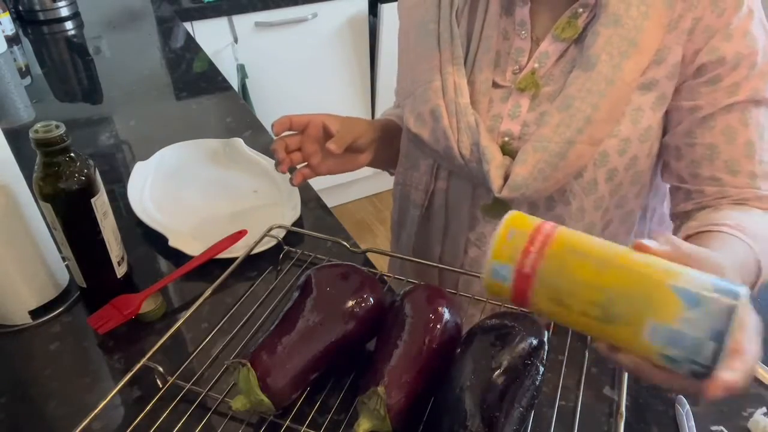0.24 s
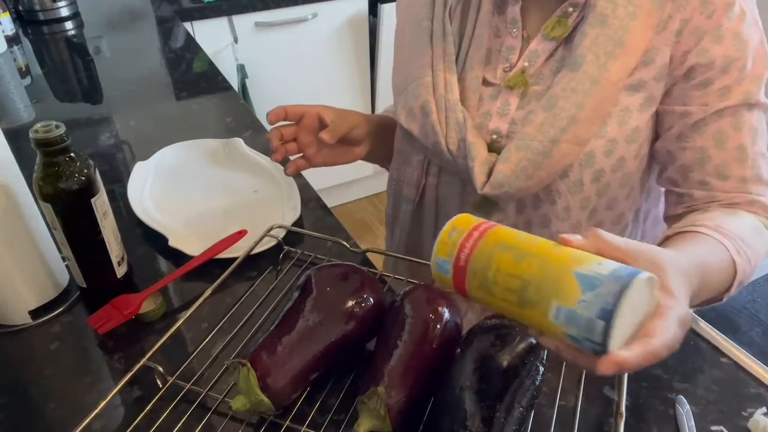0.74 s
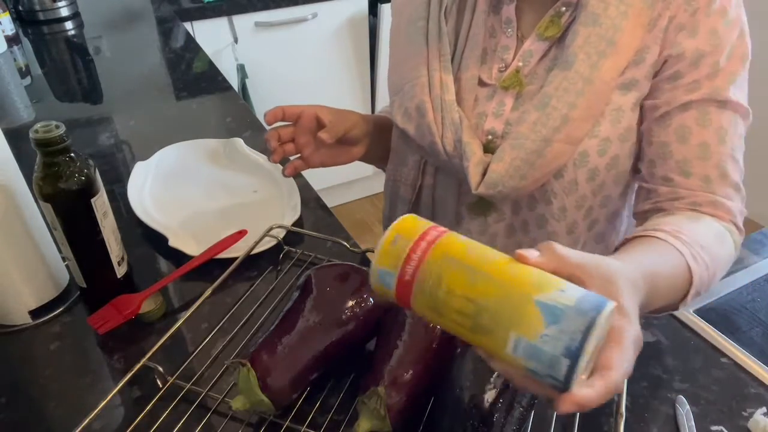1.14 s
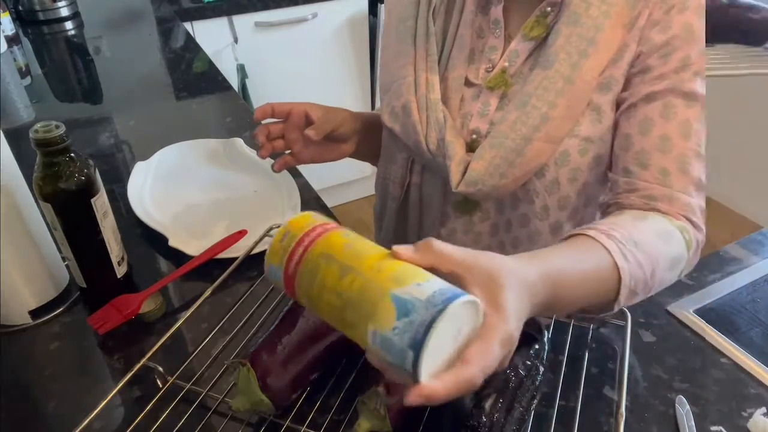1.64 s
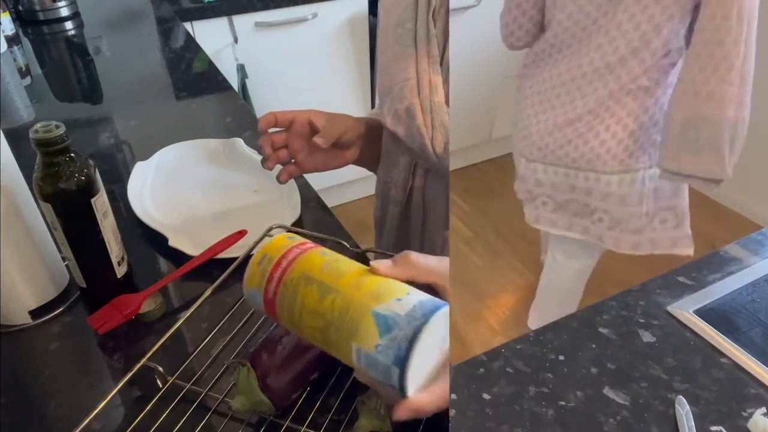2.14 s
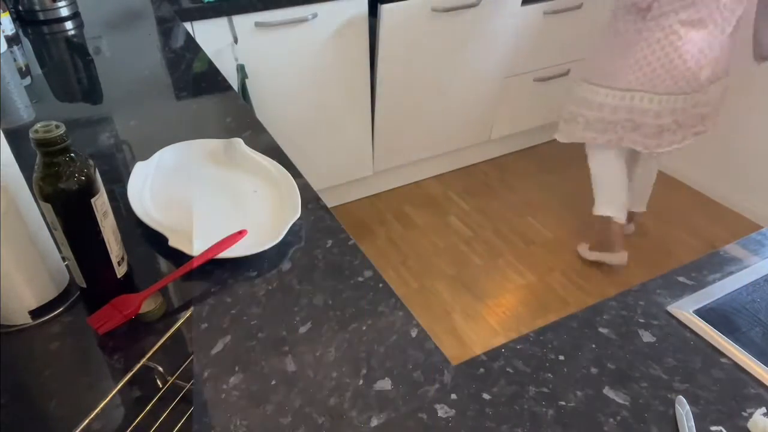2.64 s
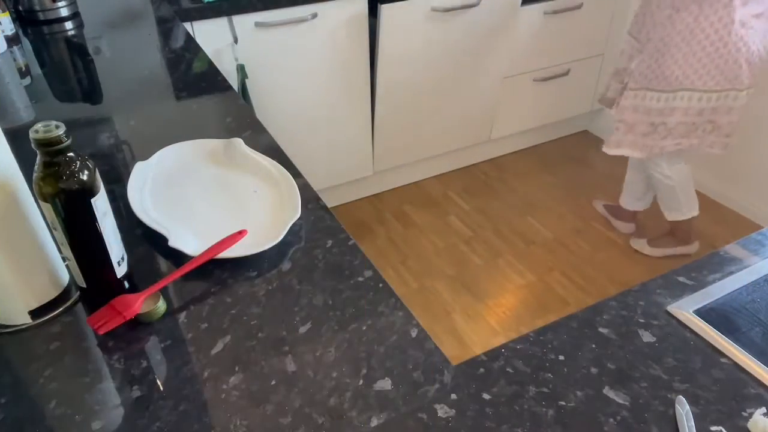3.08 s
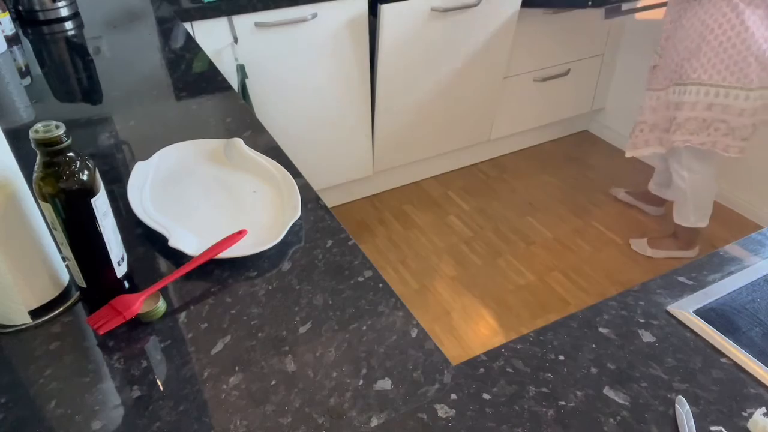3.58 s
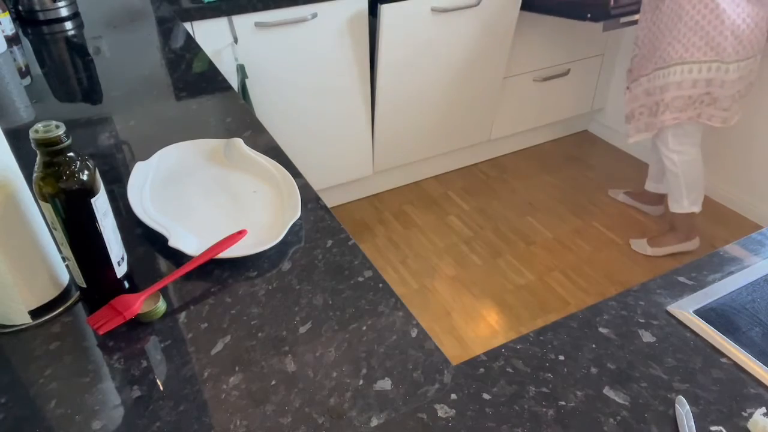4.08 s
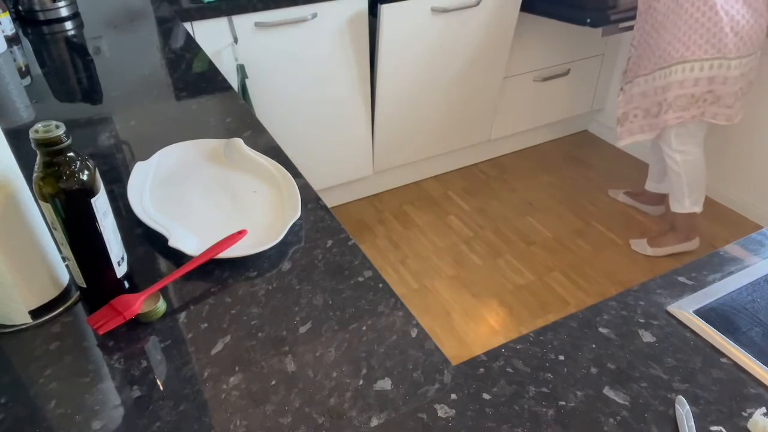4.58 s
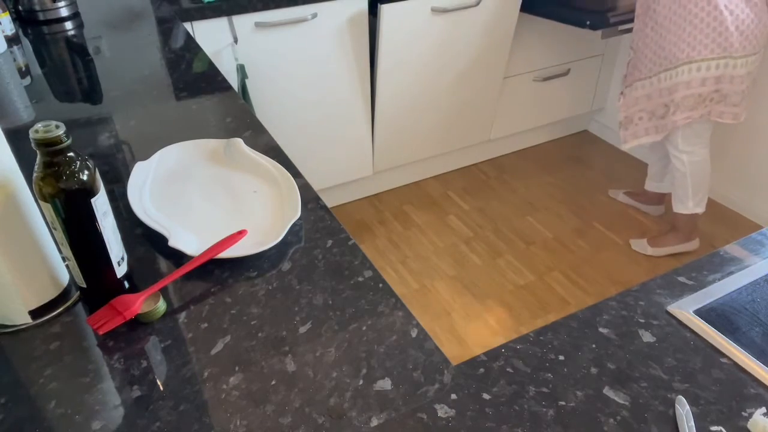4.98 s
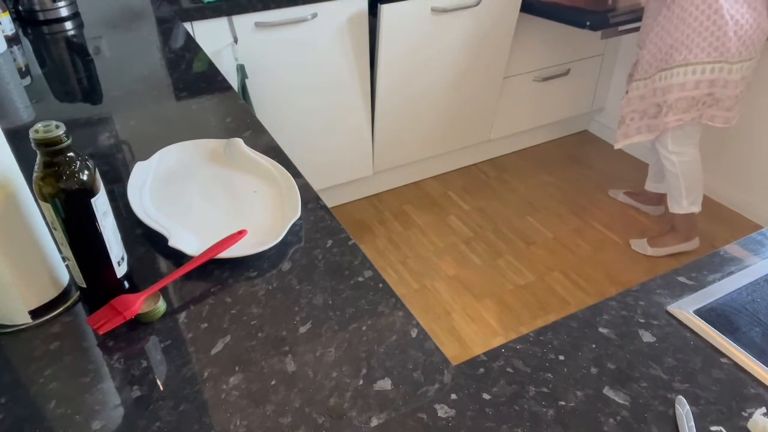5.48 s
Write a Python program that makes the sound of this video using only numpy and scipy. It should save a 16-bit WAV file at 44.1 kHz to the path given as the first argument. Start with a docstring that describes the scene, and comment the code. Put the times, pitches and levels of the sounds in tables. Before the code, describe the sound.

Salt is shaken rhythmically close by from a tub, then across the kitchen a metal rack clinks, scrapes along oven rails and bangs into place.

```python
"""Salt is shaken over aubergines on a wire rack, close to the microphones, in a small kitchen: clouds of
random grain impacts ring a tub. The last grains slide back. Across the room the rack clinks, is set into
the oven and scrapes along its rails: bursts and streams of contacts ring its wires. It bangs against
the casing, whose panels ring as dying partials. Shaped noise gives a low rumble, hum, room air,
a soft fan and a rustle."""
import sys
import numpy as np
from scipy import signal
from scipy.fft import rfft, irfft, next_fast_len
from scipy.io import wavfile
from scipy.ndimage import uniform_filter1d

SR = 44100
rng = np.random.default_rng(int(sys.argv[2]) if len(sys.argv) > 2 else 0)


def put_to_file(sound):
    """Save the sound as 16-bit audio at rate SR, in the file named by the first command-line argument."""
    columns = np.atleast_2d(sound).T  # one column per channel
    safe = np.clip(columns, -1, 1)
    whole_steps = np.round(safe * 32767)
    wavfile.write(sys.argv[1], SR, whole_steps.astype(np.int16))


N = 252252
PADDED = 2 * next_fast_len(N // 2 + SR // 4)
BINS_HZ = np.fft.rfftfreq(PADDED, 1 / SR)
TIME_S = np.arange(N) / SR


def gain_of(db):
    """Decibels to a factor."""
    return 10 ** (np.asarray(db) / 20)


def evened(x):
    """Scales to rms 1."""
    return x / np.sqrt(np.mean(x ** 2) + 1e-20)


def read(points, hz):
    """Reads a curve on a log-frequency axis."""
    f, value = np.transpose(points)
    return np.interp(np.log(hz + 1), np.log(f + 1), value)


def add(mix, s, sound):
    """Adds a sound into the mix at a time."""
    part = mix[..., max(round(s * SR), 0):][..., :sound.shape[-1]]
    part += sound[..., :part.shape[-1]]


def filtered(x, response):
    """Applies a frequency response."""
    return irfft(rfft(x, PADDED) * response)[..., :N]


def coloured(x, points, size=2048):
    """Minimum-phase filter with the given spectrum, so attacks stay sharp."""
    log_gain = np.log(gain_of(read(points, abs(np.fft.fftfreq(size, 1 / SR)))))
    taps = np.fft.ifft(np.exp(np.conj(signal.hilbert(log_gain)))).real
    return signal.oaconvolve(x, taps[None], axes=1)[:, :x.shape[1]]


def paired(x, image):
    """Blends two unrelated channels to the likeness (within +-0.99) and lean of each frequency."""
    hz, likeness, left_db = np.transpose(image)
    c = np.clip(read(np.c_[hz, likeness], BINS_HZ), -.99, .99)
    mid, side = filtered(x, np.sqrt([(1 + c) / 2, (1 - c) / 2]))
    lean = gain_of(read(np.c_[hz, left_db], BINS_HZ) / 2)
    return filtered(np.array([mid + side, mid - side]), np.array([lean, 1 / lean]))


def contacts(per_s, spread_db, size):
    """Random tiny impacts of uneven strength, mean power 1, for two channels."""
    chance = np.clip(per_s / SR, 1e-4, 1)
    strength = gain_of(spread_db * np.minimum(rng.exponential(1, (2, size)), 4))
    sign = rng.choice([-1., 1.], (2, size))
    hit = rng.random((2, size)) < chance
    return evened(strength * sign * hit / np.sqrt(chance))


def clumps(depth_db, size=300):
    """Random swells a few milliseconds long, mean power 1."""
    return evened(gain_of(depth_db * evened(uniform_filter1d(rng.standard_normal(N), size))))


def shifting(x, s, bright, pivot_hz, patchy_db, above_hz, size=8):
    """Tilts the colour over time; as the contact point wanders, patches of the spectrum swell and fade."""
    hz, t, z = signal.stft(x, SR, nperseg=512)
    octaves = np.log2(np.maximum(hz, above_hz) / pivot_hz)[:, None]
    patches = uniform_filter1d(rng.standard_normal(z.shape[1:]), size, axis=1)
    patches = evened(uniform_filter1d(patches, size // 2, axis=0))
    z = z * gain_of(octaves * np.interp(t, s, bright)) * evened(gain_of(patchy_db * patches))
    return signal.istft(z, SR, nperseg=512)[1][:, :N]


def resonance(hz, width_hz, db, bins_hz=BINS_HZ):
    """Frequency response of one damped mode."""
    return gain_of(db) / (1 + 2j * (bins_hz - hz) / width_hz)


def ringing_modes(modes, t):
    """Sum of partials, each dying by 60 dB in its t60."""
    hz, db, t60_s = np.transpose(modes)[:, :, None]
    return (gain_of(db - 60 * t / t60_s) * np.sin(2 * np.pi * hz * t)).sum(-2)


# Decay of the room. Each row: frequency in Hz, t60 in seconds.
ROOM_T60 = [(150, 0.34), (500, 0.36), (1400, 0.2), (3700, 0.2), (10000, 0.16)]


def room(x, wet_db, drift_hz=0., count=3):
    """Direct sound plus sparse reflections that die band by band; a moving source drifts between echo patterns."""
    out = x.copy()
    for k in range(count):
        taps = rng.choice([-1., 1.], (2, SR // 2)) * (rng.random((2, SR // 2)) < .1)
        taps[:, :130] = 0  # 3 ms before the first echo
        hz, t, z = signal.stft(taps, SR, nperseg=256)
        tail = signal.istft(z * gain_of(-60 * t / read(ROOM_T60, hz)[:, None]), SR, nperseg=256)[1]
        tail *= gain_of(wet_db) / np.linalg.norm(tail, axis=1, keepdims=True)
        share = np.sqrt(2 / count) * np.cos(2 * np.pi * (drift_hz * TIME_S + k / count))
        out += signal.fftconvolve(x * share, tail, axes=1)[:, :N]
    return out / np.hypot(1, gain_of(wet_db))


def steady(spectrum, levels, image):
    """Noise of one colour that follows a slow level."""
    noise = evened(filtered(rng.standard_normal((2, N)), gain_of(read(spectrum, BINS_HZ))))
    return paired(noise, image) * gain_of(np.interp(TIME_S, *np.transpose(levels)))


# Far side of the room, for the far sounds. Each row: frequency in Hz, left-right likeness, left minus right in dB.
FAR_IMAGE = [(99.4, 0.97, 2), (203, 1, 1.5), (337, 0.78, 4.5), (572, -0.38, 1.5), (800, 1, -2.5),
             (1400, -0.41, 2.5), (2520, 0.4, 1), (4300, 0.22, 2.5), (7530, -0.21, 2.5), (11500, -0.17, 6),
             (11700, 0.41, 5), (14400, -1.08, 1.5)]
# Spectrum: each row: frequency in Hz, relative dB per Hz. Level: each row: time in seconds, dB before the lean.
RUMBLE_SPECTRUM = [(20, -46), (38, -16), (55, 11), (80, -4), (110, 3.5), (170, -12.5), (400, -51)]
RUMBLE_LEVEL = [(0, -52), (2.3, -55), (3.0, -71), (5.72, -100)]


def rumble():
    """Low noise peaking near 55 Hz that fades out."""
    return steady(RUMBLE_SPECTRUM, RUMBLE_LEVEL, FAR_IMAGE)


# Spectrum: each row: frequency in Hz, relative dB per Hz. Level: each row: time in seconds, dB before the lean.
HUM_SPECTRUM = [(30, -52), (70, -22), (105, 1.5), (140, 2), (175, -6.5), (225, 1.5), (300, -16.5),
                (400, -57.5), (900, -55)]
HUM_LEVEL = [(0, -77), (2.1, -66), (3.15, -49.5), (3.85, -54), (5.72, -52)]


def hum():
    """Humming noise, strongest at 100-225 Hz."""
    return steady(HUM_SPECTRUM, HUM_LEVEL, FAR_IMAGE)


# Spectrum: each row: frequency in Hz, relative dB per Hz. Level: each row: time in seconds, dB before the lean.
AIR_SPECTRUM = [(150, -17), (380, 9), (520, 7), (780, 7.5), (1150, 0), (2300, -8.5), (4000, -15.5),
                (8000, -20), (12500, -24), (15000, -34)]
AIR_LEVEL = [(0, -67), (1.6, -58.5), (2.8, -69), (4.0, -66), (5.72, -59.5)]
# Each row: frequency in Hz, left-right likeness, left minus right in dB.
AIR_IMAGE = [(129, 0.21, 52), (344, 0.13, 0), (700, 0.1, 2.5), (2980, 0.056, 3)]


def room_air():
    """Wide mid-range noise of the room air."""
    return steady(AIR_SPECTRUM, AIR_LEVEL, AIR_IMAGE)


# Spectrum: each row: frequency in Hz, relative dB per Hz. Level: each row: time in seconds, dB before the lean.
FAN_SPECTRUM = [(300, -20), (600, -22), (1150, 10.5), (2000, 3), (2700, -4), (5000, -23), (12000, -55)]
FAN_LEVEL = [(0, -96), (3.3, -66.5), (5.72, -60.5)]


def oven_fan():
    """Soft fan noise around 1-2 kHz that grows."""
    return steady(FAN_SPECTRUM, FAN_LEVEL, FAR_IMAGE)


# Spectrum: each row: frequency in Hz, relative dB per Hz. Level: each row: time in seconds, dB before the lean.
RUSTLE_SPECTRUM = [(800, 8.5), (2500, 4.5), (5000, 0.5), (9000, -1.5), (13000, -0.5), (16000, 10)]
RUSTLE_LEVEL = [(0, -59), (2.6, -73), (3.25, -57), (3.46, -56), (3.62, -85)]


def rustle():
    """Soft broad noise whose level dips and swells."""
    return steady(RUSTLE_SPECTRUM, RUSTLE_LEVEL, FAR_IMAGE)


# Rack against oven, for casing() and knocks(). Each row: start in seconds, relative level in dB,
# brightness in dB per octave, build-up in seconds, relative deep boom in dB, relative hollow panel in dB,
# pitch of its thud in Hz, ring of the wires in dB, pitch of the touched spot in Hz.
KNOCKS = [ (3.08, -42, -0.1, 0.0023, -56, -49, 328, -18, 7800),
          (3.475, -35.5, 1.4, 0.0026, -46, -41.5, 258, -17, 4000),
          (4.010, -50, -4.5, 0.0062, -51, -30, 274, -2, 1050),
          (4.139, -42.5, -1, 0.0057, -53, -37.5, 280, -18, 1130),
          (4.212, -34, -0.1, 0.01, -31, -31.5, 268, -3.5, 835),
          (4.490, -53, 1, 0.0081, -36, -45.5, 223, 11, 1950),
          (4.677, -29.5, -0.5, 0.0048, -37, -30, 230, 0.5, 1500),
          (4.684, -29.5, -1.5, 0.005, -12, -26.5, 224, -2, 1060),
          (4.695, -26.5, -1.5, 0.0022, -50, -30, 231, -10.5, 2060),
          (4.719, -35.5, -3, .003, -50, -35, 297, -10, 1100),
          (4.776, -42.5, -4, 0.00667, -35, -33, 276, 1, 830),
          (4.859, -48.5, -6.5, 0.0028, -40.5, -62, 294, -1.5, 1070),
          (4.986, -41.5, -5, 0.0091, -24.5, -38, 258, 3, 842),
          (5.003, -38, -5, 0.0055, -40, -26.5, 253, 0, 1190),
          (5.016, -33.5, -1.5, 0.00615, -46, -37, 287, -1, 1200),
          (5.043, -38.5, -0.5, 0.0038, -40, -32.5, 252, -7, 1200),
          (5.078, -42, -0.5, 0.0037, -34, -44, 248, 1.5, 840),
          (5.132, -48, -3, 0.0036, -52, -43, 218, -7, 1100),
          (5.293, -47, -0.5, 0.0034, -37, -42, 284, -10, 1210),
          (5.456, -46, -2.5, 0.0029, -66, -54, 270, 5.5, 1250),
          (5.504, -48, -2, 0.0058, -64, -32.5, 272, 5, 870),
          (5.669, -38, 0.5, 0.0022, -60, -45, 330, 3, 6500)]
# Deep boom of the casing, then its hollow panels. Each row: frequency in Hz, relative level in dB, t60 in seconds.
BOOM_MODES = [(134.7, -3.5, 0.23), (177, -19.5, 0.18)]
PANEL_MODES = [(233.7, -4, 0.11), (298, -6.5, 0.33), (398, -20.5, 0.26), (444, -25, 0.31),
               (483, -19, 0.074)]
PANEL_SWELL_S = 0.004
THUD_DB, THUD_T60_S = 6, 0.095  # the struck part of the panel thuds at its own pitch


def casing(low_hz=90):
    """Blows set the oven's panels swinging; they take a moment to swell and radiate no deep bass."""
    out, t = np.zeros(N), np.arange(SR // 2) / SR
    boom, panel = ringing_modes(BOOM_MODES, t), ringing_modes(PANEL_MODES, t)
    swell = 1 - np.exp(-t / PANEL_SWELL_S)
    for s, _, _, build_s, boom_db, panel_db, thud_hz, _, _ in KNOCKS:
        thud = ringing_modes([(thud_hz, THUD_DB, THUD_T60_S)], t)
        blow = gain_of(boom_db) * boom + gain_of(panel_db) * (panel + thud)
        # the casing gives way when the knock reaches its full force
        add(out, s + build_s, blow * swell)
    out = signal.sosfilt(signal.butter(5, low_hz, "high", fs=SR, output="sos"), out)
    return room(np.array([out, out]), wet_db=-21) * gain_of(0) * np.array([[gain_of(.7)], [gain_of(-.7)]])


# Where thump, clunk, ring and tick lie, in Hz.
STRIKE_HZ = [450, 1200, 4400, 11500]
PIVOT_HZ, ENDS_LIFT_DB = 4350, 0.02  # brightness pivots here; the ends rise by this much per octave squared


def strike(db, bright, build_s, decay_s, thump_growth=0.19, snap_db=-1, snap_decay_s=0.0053):
    """A sharp first contact, and a burst of smaller ones that builds up and rattles out."""
    t = np.arange(SR // 3) / SR
    force = np.minimum((t + 1 / SR) / build_s, 1) * np.exp(-np.maximum(t - build_s, 0) / decay_s)
    rattle = force * contacts(per_s=6000, spread_db=2.0, size=len(t))
    # the first metal-on-metal touch is short and bright
    touch = contacts(per_s=26000, spread_db=-1.0, size=len(t))
    snap = np.diff(touch, prepend=0) * np.exp(-t / snap_decay_s)
    octaves = np.log2(np.array(STRIKE_HZ[1:]) / PIVOT_HZ)
    clunk_db, ring_db, tick_db = db + bright * octaves + ENDS_LIFT_DB * octaves ** 2
    # weak knocks move the heavy parts less
    thump_db = clunk_db + thump_growth * min(clunk_db + 28.0, 0)
    spectrum = list(zip(STRIKE_HZ, (thump_db, clunk_db, ring_db, tick_db)))
    return coloured(rattle + gain_of(snap_db) * snap, spectrum)


# Wires of the rack and walls of the oven. Each row: frequency in Hz, width in Hz,
# dB over the broad clatter before the ring of each touch.
RACK_MODES = [(825, 26, -11.5), (840, 26, -3.5), (1058, 22, -7.5), (1080, 25, -4.5), (1244, 23, 4.5),
              (1298, 17, -19), (1960, 53, 4.5), (2075, 16, 1), (2250, 12, -22), (2663, 85, 1),
              (3030, 80, 3), (3090, 9.5, -18), (4190, 310, 0.5), (3950, 39, -13)]


def wires(x, ring_db, uneven_db=2.0, detune=0.01):
    """Rings the rack; every touch stirs its modes in other proportions and bends their pitch a little."""
    size = next_fast_len(x.shape[1] + SR // 8)
    bins_hz = np.fft.rfftfreq(size, 1 / SR)
    chance = rng.standard_normal((len(RACK_MODES), 2))
    body = 1
    for (hz, width_hz, db), (bend, share) in zip(RACK_MODES, chance):
        body = body + resonance(hz * (1 + detune * bend), width_hz, db + ring_db + uneven_db * share, bins_hz)
    return irfft(rfft(x, size) * body, size)[:, :x.shape[1]]


def spot(x, hz, lift_db, sharpness):
    """Lifts the pitch of the spot that is touched."""
    return x + gain_of(lift_db) * signal.lfilter(*signal.iirpeak(hz, max(sharpness, 1), SR), x)


# Clinks and clacks of the rack. Each row: start in seconds, relative level in dB, brightness in dB per octave,
# rattle decay in seconds, ring of the wires in dB, pitch of the touched spot in Hz.
CLINKS = [ (2.921, -64.5, 7.5, 0.0028, -12, 3870), (2.970, -61, -6, 0.019, -21, 1290),
          (3.009, -51.5, 0, 0.0056, -20, 1200), (3.134, -52.5, -2.5, 0.013, -14, 2100),
          (3.142, -45, -3, 0.0062, -8, 1630), (3.281, -69.5, -8, 0.022, -20, 766),
          (3.301, -64, 3.5, 0.0048, -10, 4830), (3.458, -55.5, 0.5, 0.017, -20, 2370),
          (4.109, -61.5, -4, 0.011, -4, 1200), (4.338, -50.5, 1, 0.014, -12, 1050),
          (4.403, -47.5, 3.5, 0.033, -10, 4400), (4.530, -58, -3.5, 0.006, 4, 1260),
          (4.634, -49, -1, 0.026, -3, 900), (4.662, -47.5, -5, 0.043, -11, 2380),
          (4.951, -64.5, 0, 0.024, 0, 1987), (5.205, -49.5, -4.5, 0.009, -13, 2700),
          (5.350, -59, 2, 0.019, 1, 4300), (5.605, -61.5, 0, 0.026, -5, 4280),
          (5.676, -39, 2, 0.017, 1, 845)]
# Broad clatter. Each row: frequency in Hz, relative dB per octave.
CLATTER_SPECTRUM = [(50, -29), (130, 0), (280, 2.5), (420, -3), (600, -4), (900, 1), (1500, 2), (3000, 2),
                    (5300, 3.5), (7000, 6), (9000, 2.5), (13000, 0.5), (15500, 1.5)]
CLINK_BUILD = 0.25  # build-up as a share of the decay
RATTLE_S, RATTLE_GROWTH = 0.0088, 0.74  # a knock's decay: this time plus a share of its build-up
CLINK_Q, KNOCK_Q = 4.8, 5.4
CLINK_SPOT_DB, KNOCK_SPOT_DB = 7, -6.5


def knocks(level_db=1):
    """Knocks and light clinks, each coloured by its spot; the rack rings little while it is held in the hand."""
    out = np.zeros((2, N))
    for s, db, bright, build_s, _, _, _, ring_db, hz in KNOCKS:
        knock = strike(db, bright, build_s, RATTLE_S + RATTLE_GROWTH * build_s)
        add(out, s, wires(spot(knock, hz, KNOCK_SPOT_DB, KNOCK_Q), ring_db))
    for s, db, bright, decay_s, ring_db, hz in CLINKS:
        clink = strike(db, bright, CLINK_BUILD * decay_s, decay_s)
        add(out, s, wires(spot(clink, hz, CLINK_SPOT_DB, CLINK_Q), ring_db))
    return coloured(out, CLATTER_SPECTRUM) * gain_of(level_db)


# Range of pitches at which the wires catch on the rails: lowest and highest in Hz.
CATCH_RANGE_HZ = [897, 8030]
CATCH_Q = 14


def catches(per_s=12, spread_db=1.3, count=14):
    """Sparse small contacts, each with a brief ring at the pitch of its own spot."""
    pitches_hz = np.geomspace(*CATCH_RANGE_HZ, count) * rng.uniform(.94, 1.06, count)
    out = np.zeros((2, N))
    for hz in pitches_hz:
        out += signal.lfilter(*signal.iirpeak(hz, CATCH_Q, SR), contacts(per_s, spread_db, size=N))
    return evened(out)


SLIDE_RING_DB = -4  # the rails damp the wires while the rack slides on them


def travelling(x, turns_per_s=6, count=3):
    """As the rack moves, other wires touch the rails, so its ring keeps changing."""
    shares = [2 / count * np.cos(np.pi * (turns_per_s * TIME_S + k / count)) ** 2 for k in range(count)]
    return sum(wires(x * share, SLIDE_RING_DB, uneven_db=6, detune=0.022) for share in shares)


# Pushes of the rack along its rails. Each row: start in seconds, end in seconds, relative level in dB.
PUSHES = [(4.153, 4.256, -44), (4.316, 4.537, -44), (4.597, 4.877, -54), (5.018, 5.37, -47),
          (5.417, 5.478, -44.5)]
# Each row: frequency in Hz, relative dB per octave.
SCRAPE_SPECTRUM = [(50, -65), (140, -26.5), (260, -3.5), (500, -18), (850, -4.5), (1500, -0.5),
                   (4200, -1.5), (7000, 2.5), (10000, 2.5), (13000, 4.5), (15500, -5)]
PUSH_RISE_S, PUSH_COAST_S = 0.077, 0.062  # linear rise, exponential coast
# level at which the scrape has its own colour; dB per octave gained for each dB louder
SLIDE_NEUTRAL_DB, SLIDE_BRIGHTENING = -40.5, 0.27
CATCH_DB = -4


def slide(level_db=-2.5):
    """Uneven slips and catches; each push gathers speed, holds and coasts; faster is louder and brighter."""
    speed = np.zeros(N)
    for start_s, end_s, db in PUSHES:
        rise = np.clip((TIME_S - start_s) / PUSH_RISE_S, 0, 1)
        coast = np.exp(-np.maximum(TIME_S - end_s, 0) / PUSH_COAST_S)
        speed += gain_of(db) * rise * coast
    bright = SLIDE_BRIGHTENING * (20 * np.log10(np.maximum(speed, 1e-3)) - SLIDE_NEUTRAL_DB)
    slips = contacts(per_s=1100, spread_db=3, size=N) * clumps(depth_db=2.8)
    scrape = coloured(slips + gain_of(CATCH_DB) * catches(), SCRAPE_SPECTRUM)
    scrape = shifting(scrape, TIME_S, bright, pivot_hz=2350, patchy_db=2.0, above_hz=300)
    return travelling(scrape * speed * gain_of(level_db))


def pink(x):
    """Gives white sound of power 1 about that power in every octave and a half above 100 Hz."""
    return coloured(x, [(hz, 10 * np.log10(SR / 2 / hz)) for hz in (100, 20000)])


def rack(level_db=-3.0, low_hz=115):
    """Knocks and slips of the rack, far across the room; thin wires radiate no deep bass."""
    ringing = pink(knocks() + slide()) * gain_of(level_db)
    ringing = signal.sosfilt(signal.butter(3, low_hz, "high", fs=SR, output="sos"), ringing)
    return paired(room(ringing, wet_db=1.0, drift_hz=3), FAR_IMAGE)


# Salt is thrown to and fro about six times a second, then slides back as the tub is turned upright.
# Each row: crest in seconds, relative level in dB, half length in seconds.
THROWS = [(0, -38.5, 0.019), (0.085, -41.5, 0.019), (0.139, -48.5, 0.013), (0.235, -34, 0.025),
          (0.318, -41.5, 0.024), (0.394, -49.5, 0.017), (0.463, -38, 0.029), (0.541, -41.5, 0.014),
          (0.623, -34.5, 0.024), (.717, -40, 0.022), (.79, -36.5, 0.02), (0.882, -35, .019),
          (0.96, -38.5, .025), (1.056, -35, 0.019), (1.132, -35.5, 0.022), (1.229, -33.5, 0.02),
          (1.305, -37.5, 0.027), (1.398, -36.5, .017), (1.465, -38, 0.025), (1.557, -37.5, 0.015),
          (1.634, -34.5, 0.022), (1.717, -36, 0.018), (1.791, -38, 0.023), (1.876, -39, 0.017),
          (1.951, -36.5, 0.023), (2.052, -40.5, 0.021), (2.116, -43.5, 0.022), (2.207, -41, 0.021),
          (2.288, -43.5, 0.025), (2.383, -56, 0.027), (2.576, -57.5, 0.049), (2.673, -52.5, 0.052),
          (2.718, -54, 0.028)]
# Grains on the tub wall and lid. Each row: frequency in Hz, relative dB per Hz.
SALT_SPECTRUM = [(180, -59), (380, -13), (660, -20), (820, -15), (1160, -19.5), (1500, -17), (1800, -17),
                 (2600, -9), (4000, -4.5), (6200, -3), (8500, -4), (12000, 3), (14000, -1), (15400, -20.5)]
# The tub turns its lid away as it travels over the rack. Each row: time in seconds, brightness in dB per octave.
SALT_TILT = [(0, -0.5), (.9, -.5), (1.3, 0), (1.701, 2), (2.2, 1), (2.7, -1)]
# Resonances of the tub. Each row: frequency in Hz, width in Hz, level over the direct patter in dB.
TUB_MODES = [(804, 21, 10.5), (1505, 130, -3)]
# Stereo image of the tub: the two channels swing between alike and opposite across the treble. Each row:
# frequency in Hz, left-right likeness, left minus right in dB.
SALT_IMAGE = [(350, .3, -4), (700, 0.24, -2), (1500, 0.59, 2.5), (3300, 0.23, 2), (4940, -0.18, 3.5),
              (6170, 0.04, 6.5), (7920, -0.98, -0.5), (9340, -0.43, 2), (11240, .98, -0.5),
              (12800, .98, 1.2), (14700, -0.98, 0)]


def salt(grains_per_s=19000, level_db=-0.5):
    """Each throw lands fine grains and a few coarse crystals on the tub; heavier flow has denser grains."""
    flow = np.zeros(N)  # power
    for s, db, length_s in THROWS:
        u = (TIME_S - s) / length_s
        # the heap arrives quickly and stragglers trail behind
        flow += gain_of(db) ** 2 * np.exp(np.where(u < 0, -u * u, 2 - 2 * np.hypot(1, u)))
    density_per_s = grains_per_s * np.sqrt(flow / flow.max()) + 1500
    fine = contacts(density_per_s, spread_db=0.3, size=N) * clumps(depth_db=0.45)
    coarse = gain_of(-6.5) * contacts(per_s=400, spread_db=1.3, size=N)
    patter = coloured(fine + coarse, SALT_SPECTRUM)
    patter = shifting(patter, *np.transpose(SALT_TILT), pivot_hz=9400, patchy_db=1.66, above_hz=2900)
    tub = 1 + sum(resonance(*mode) for mode in TUB_MODES)
    hollow = filtered(evened(patter) * np.sqrt(flow), tub)
    return paired(room(hollow * gain_of(level_db), wet_db=-12), SALT_IMAGE)


def scene():
    """The kitchen's steady sounds, the oven and rack far off, and salt near by."""
    kitchen = rumble() + hum() + room_air() + oven_fan() + rustle()
    return kitchen + casing() + rack() + salt()


EDGE_HZ = 15700


def record(dry):
    """The recorder's band limit."""
    low_pass = signal.firwin(511, EDGE_HZ, window=("kaiser", 9), fs=SR)
    return signal.oaconvolve(dry, low_pass[None], "same")


dry = scene()
out = record(dry)
put_to_file(out)
```